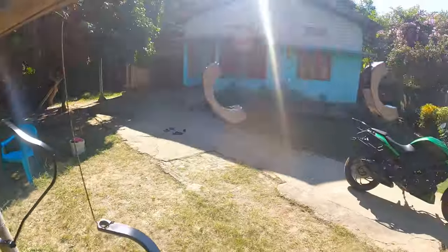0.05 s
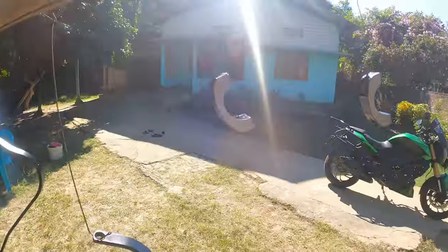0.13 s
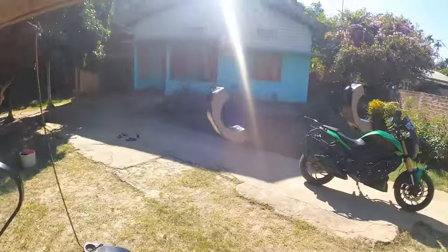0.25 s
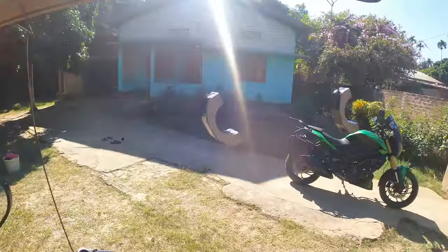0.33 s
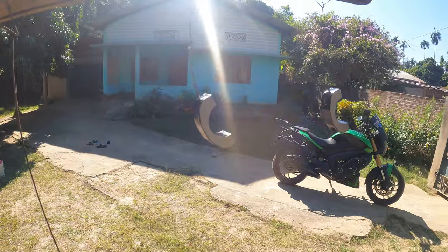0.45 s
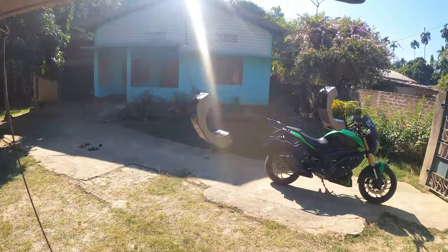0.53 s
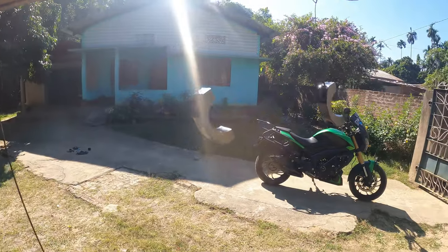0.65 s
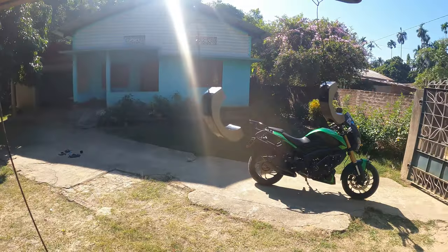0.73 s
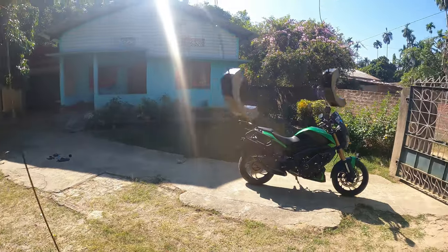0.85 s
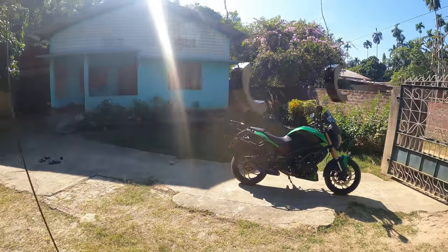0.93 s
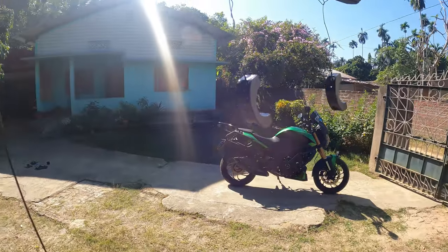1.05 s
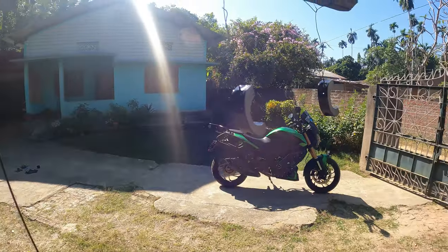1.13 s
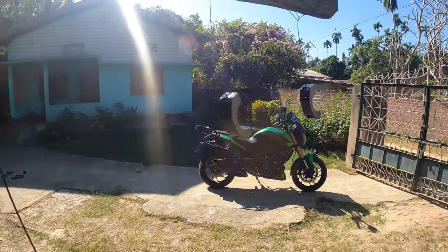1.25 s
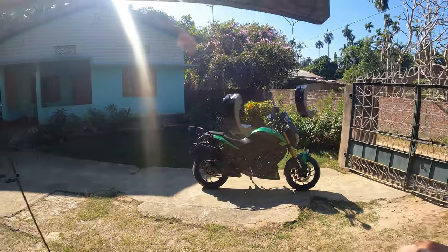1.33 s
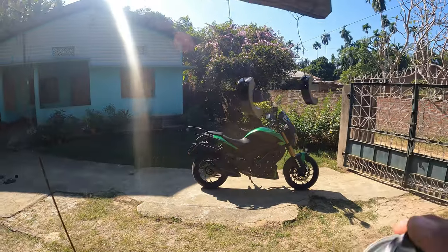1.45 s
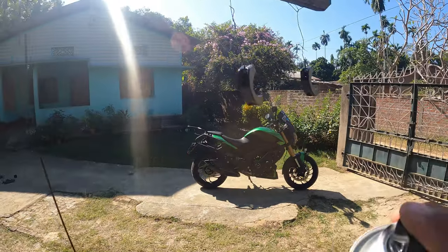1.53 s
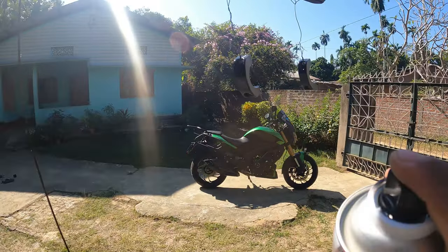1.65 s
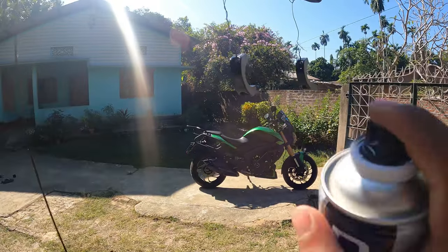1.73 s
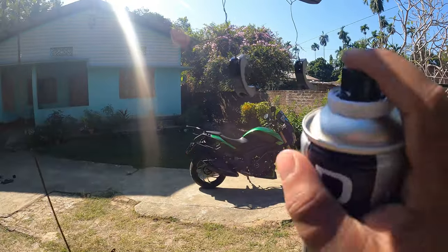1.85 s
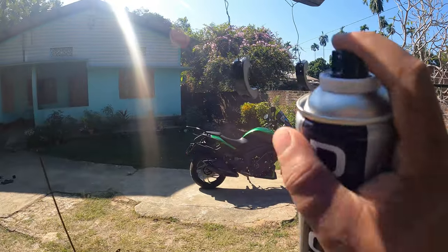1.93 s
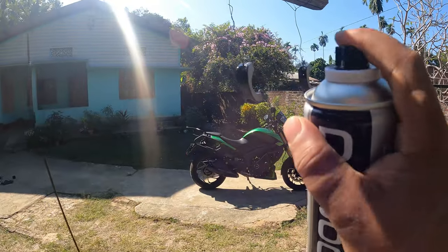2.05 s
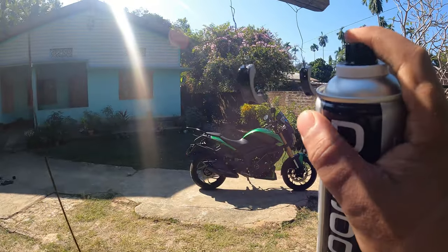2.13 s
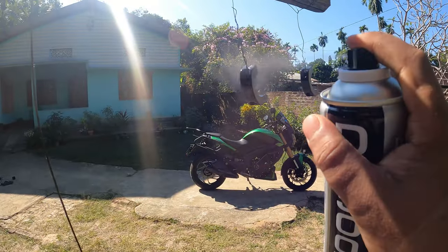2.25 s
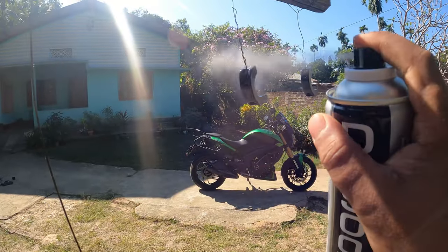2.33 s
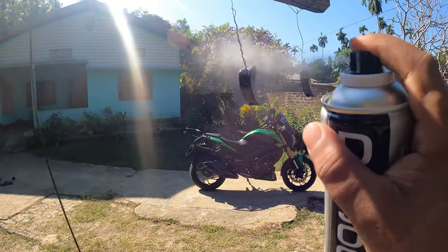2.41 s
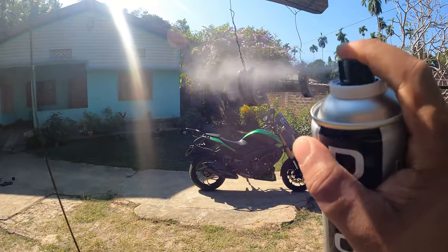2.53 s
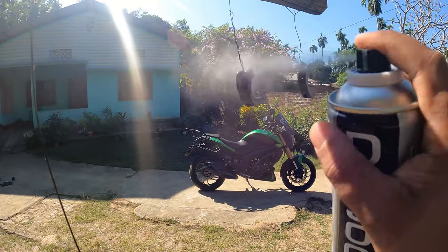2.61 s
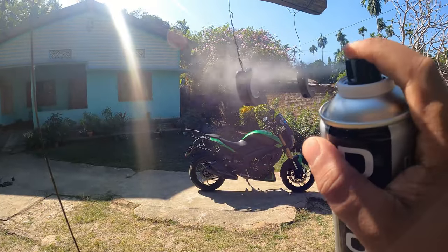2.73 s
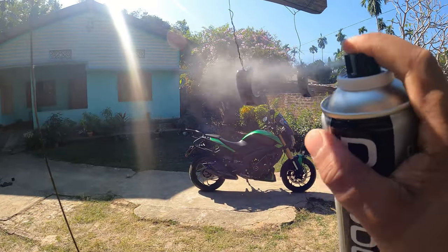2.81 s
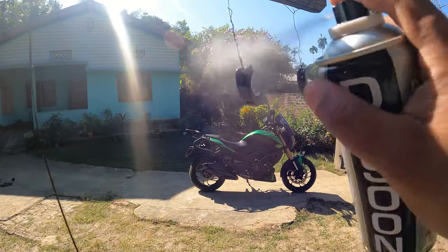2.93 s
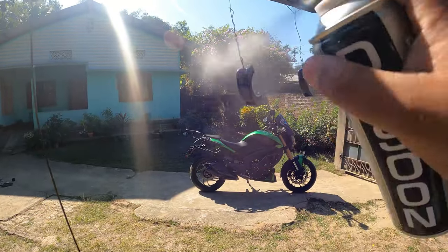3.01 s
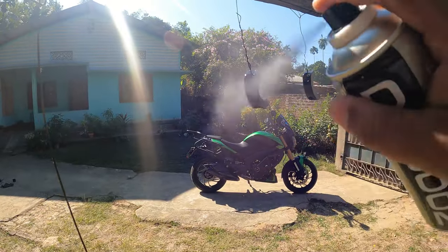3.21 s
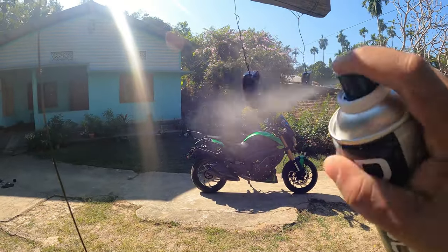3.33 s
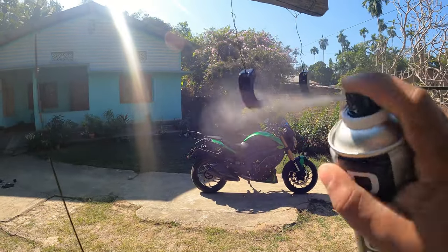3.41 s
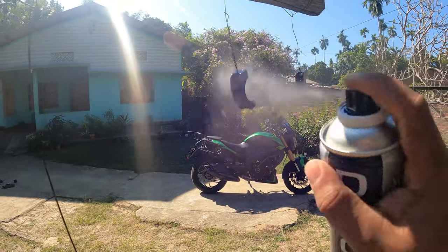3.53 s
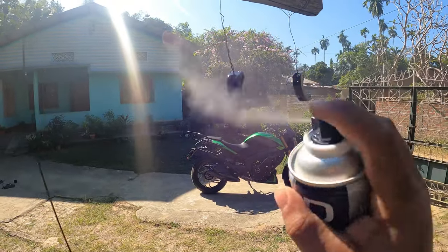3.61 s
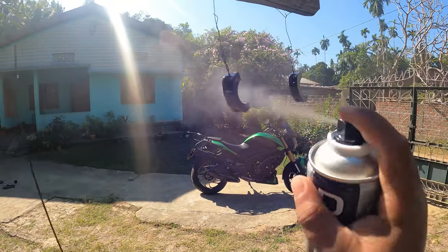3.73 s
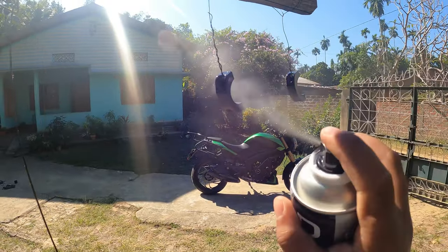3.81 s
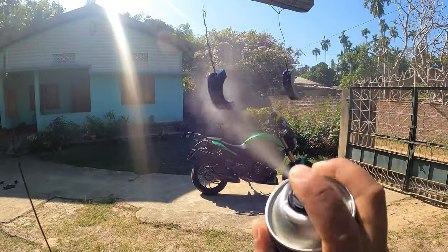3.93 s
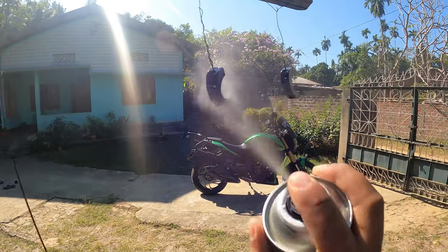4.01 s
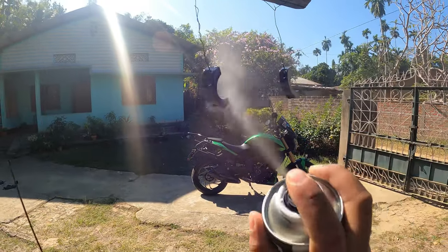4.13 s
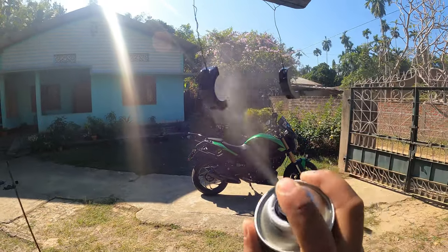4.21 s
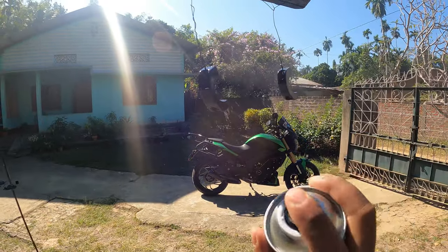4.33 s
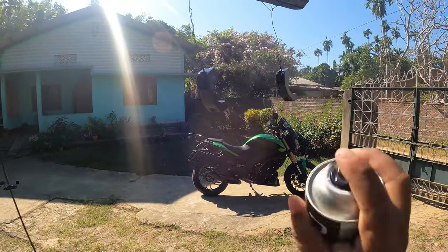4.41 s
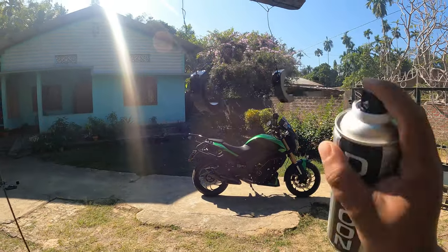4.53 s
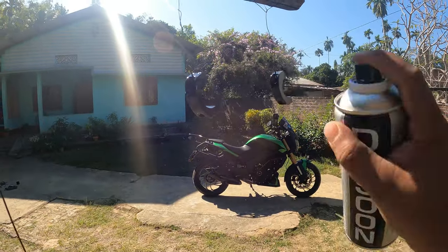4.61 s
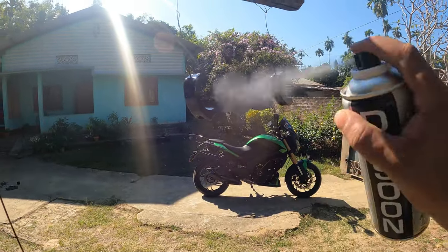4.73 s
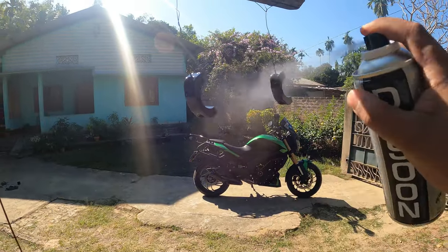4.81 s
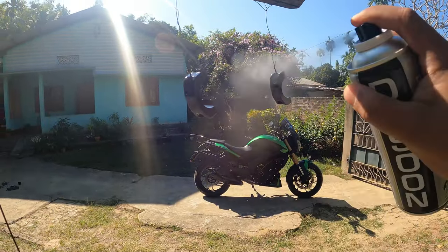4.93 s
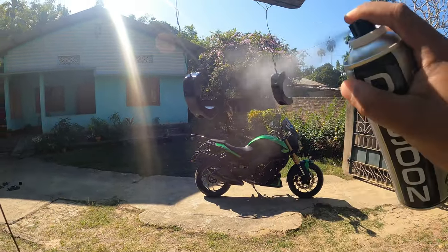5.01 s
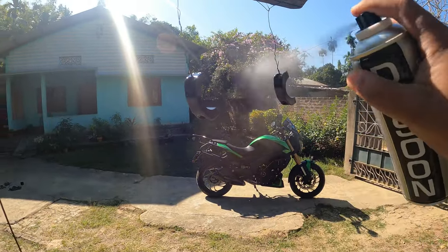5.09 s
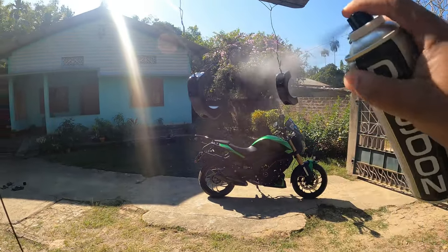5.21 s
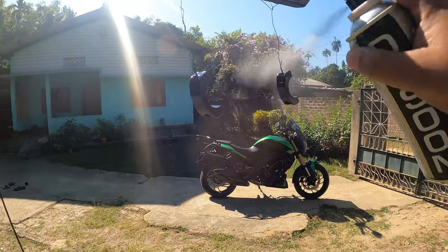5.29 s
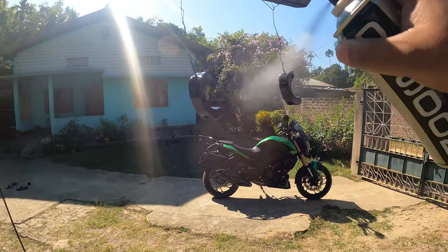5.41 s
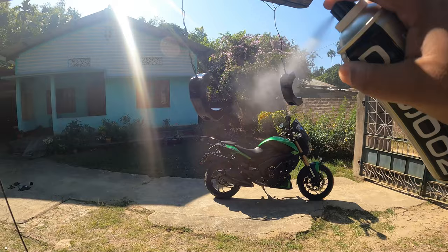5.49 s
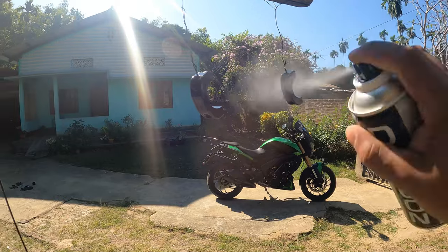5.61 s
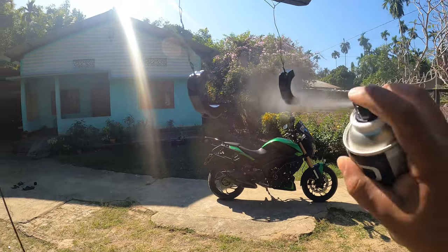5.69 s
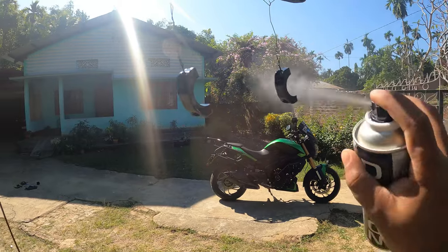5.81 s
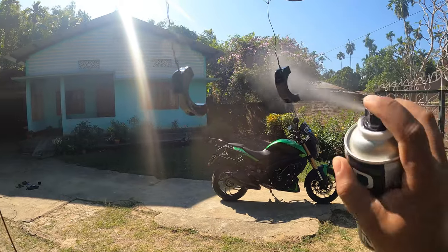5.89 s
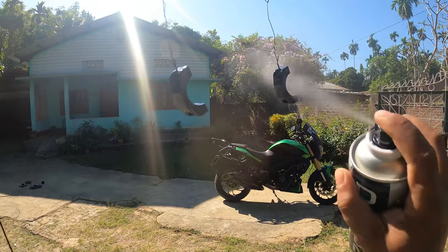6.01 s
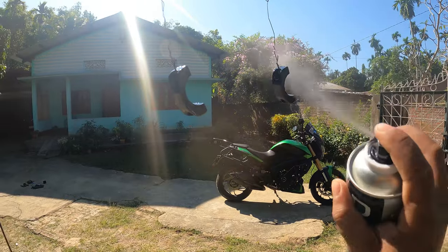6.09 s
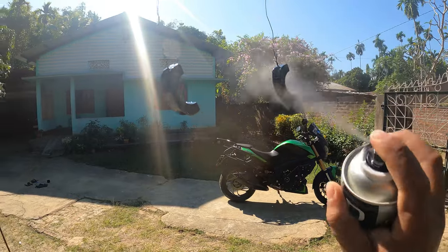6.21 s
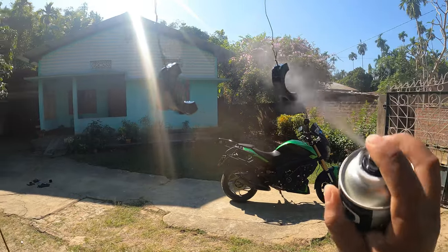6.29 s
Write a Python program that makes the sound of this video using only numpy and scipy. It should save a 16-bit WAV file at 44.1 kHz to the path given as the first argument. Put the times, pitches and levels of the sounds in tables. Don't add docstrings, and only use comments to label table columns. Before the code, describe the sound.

A quiet yard with a low, dull wash of leaves and distant noise and faint wind puffs. From 0 to 0.8 s feet rustle dry grass with papery scrapes, crisp stem snaps and soft low thuds; lighter rustles follow near 1.2 and 1.6 s. From 1.68 to 2.3 s a mixing ball clacks irregularly against a spray can, bright, hard and very short, with fingers scraping the metal. At 2.3 s a thin leak hisses, bursting at 2.4 s into a loud, turbulent jet, which wavers in brightness as the can turns, dipping around 3.2 s, and closes quickly around 4.3-4.4 s. Near 4.7 s come two small clacks, a finger scrape and a tiny chatter. A fainter leak at 4.75 s swells into a second jet at 4.8 s, slightly muffled around 5.3-5.6 s, fuller afterward and continuing to the end, about 6.4 s. Close, dry outdoor pickup.

```python
import sys
import numpy as np
from scipy import signal
from scipy.fft import rfft, irfft
from scipy.io import wavfile
from scipy.ndimage import uniform_filter1d

SR = 44100
rng = np.random.default_rng(int(sys.argv[2]) if len(sys.argv) > 2 else 0)


def magnitude_from_level(level_db):
    exponent = np.asarray(level_db, float) / 20
    return 10 ** exponent


def transcribe(u):
    v = np.clip(np.atleast_2d(u).T, -1, 1)
    q = np.round(v * 32767).astype(np.int16)
    wavfile.write(sys.argv[1], SR, q)


N = 280029

# start in seconds, peak level in dB, ring of the base in dB,
# ring of the shoulder in dB (both over the ring of the wall).
KNOCKS = [(1.6758, -4, -43, -6), (1.6974, -25, -24, -21), (1.717, -28, -18, -17), (1.731, -30, -4, -10),
          (1.7474, -25, -27, -30), (1.7893, -4, -42, -10), (1.8161, -15.5, -25, 7), (1.8281, -4, 3, -11),
          (1.868, -24, -29, -13), (1.8716, -5.5, -39, -4), (1.9603, -5, -38, 3), (2.0157, -7, 20, 9),
          (2.034, -4.5, -31, 1.5), (2.0716, -13, 3, -6), (2.1103, -4.5, 0.5, 6), (2.1254, -11, 25, 16),
          (2.1715, -5, 4, 8), (2.1747, -11, 18, 8), (2.195, -14, 3, 8), (2.2199, -16.5, -3, 9),
          (2.2373, -21, -4, 15), (2.2538, -11, 4, 3), (2.3113, -19, 8, 3), (4.6846, -16.5, -14, 4),
          (4.6978, -8.5, -32, 4)]
# leak opens in seconds, jet opens in seconds, finger lifts in seconds,
# time the valve takes to open in seconds.
PRESSES = [
    (2.302, 2.391, 4.298, .004),
    (4.754, 4.815, 7.0, .028),
]


def evened(x):
    return x / np.sqrt(np.mean(x ** 2) + 1e-20)


def read(points, hz):
    f, value = np.transpose(points)
    return np.interp(np.log(hz + 1), np.log(f + 1), value)


def add(mix, s, sound):
    part = mix[round(s * SR):][:len(sound)]
    part += sound[:len(part)]


def bandpass(x, order, low_hz, high_hz):
    return signal.sosfilt(signal.butter(order, [low_hz, high_hz], "bandpass", fs=SR, output="sos"), x)


def causal(points):
    log_gain = np.log(magnitude_from_level(read(points, abs(np.fft.fftfreq(2048, 1 / SR)))))
    return np.fft.ifft(np.exp(np.conj(signal.hilbert(log_gain)))).real[:512]


def swells(rows, rise=1.0):
    t = np.arange(N) / SR
    power = 0
    for s, db, fall in rows:
        falls = np.maximum((t - s), (s - t) / rise) / fall
        power = power + magnitude_from_level(db - 8 * falls) ** 2
    return np.sqrt(power)


def hiss(points, patchy_db, flicker_db, drift_db):
    frames, hz = N // 128 + 6, np.fft.rfftfreq(512, 1 / SR)
    a, b, fine, broad = rng.standard_normal((frames, 257, 4)).T
    patches = uniform_filter1d(fine, size=6, axis=0)
    patches = evened(uniform_filter1d(patches, size=30, axis=1))
    drifts = uniform_filter1d(broad, size=7, axis=0)
    drifts = uniform_filter1d(drifts, size=90, axis=1)
    drifts = evened(uniform_filter1d(drifts, size=50, axis=1))
    drifts = drifts * np.clip(hz / 6000, .2, 1.5)[:, None]
    flicker = evened(uniform_filter1d(rng.standard_normal(frames), size=4))
    z = (a + 1j * b) * magnitude_from_level(patchy_db * patches + flicker_db * flicker + drift_db * drifts)
    spectrum = rfft(signal.istft(z, nperseg=512, noverlap=384)[1][:N])
    return spectrum * magnitude_from_level(read(points, np.fft.rfftfreq(N, 1 / SR)))


def yard():
    # frequency in Hz, level in dB per Hz.
    wash_colour = [(20, -30), (60, -15), (150, 1), (300, -0.5), (1000, -8), (3000, -14.5), (6000, -28.5),
                   (9000, -38.5), (16000, -70)]
    # peak time in seconds, level in dB, time to fall by 8 dB in seconds.
    gusts = [
        (1.0, -54, .08),
        (1.75, -68, .4),
        (2.74, -62, .35),
        (4.1, -64, .2),
        (6.3, -63, .12),
    ]
    calm_db = -75
    duck_db, duck_from_s, duck_s = -3.3, 1.7, .4
    ducking_db = duck_db * np.clip((np.arange(N) / SR - duck_from_s) / duck_s, 0, 1)
    leaves = irfft(hiss(wash_colour, patchy_db=.6, flicker_db=.5, drift_db=-0.7), N)
    wash = magnitude_from_level(-51 + ducking_db) * evened(leaves)
    puffs = evened(bandpass(rng.standard_normal(N), 3, 40, 95))
    return wash + magnitude_from_level(-4) * (magnitude_from_level(calm_db) + swells(gusts, rise=1.6)) * puffs


def steps():
    # frequency in Hz, level in dB per Hz.
    grass_colour = [(400, -35), (900, -10), (1500, -2.5), (2700, 0), (4500, -2.5), (7000, -12), (9500, -21),
                    (12000, -31), (16000, -44)]
    # peak time in seconds, level in dB, time to fall by 8 dB in seconds.
    treads = [
        (.15, -49.5, .06),
        (.45, -55, .1),
        (.62, -49, .05),
        (1.19, -55.5, .05),
        (1.58, -52, .08),
    ]
    # peak time in seconds, level in dB, time to fall by 8 dB in seconds.
    grips = [
        (1.665, -46, .015),
        (1.83, -52, .08),
        (2.1, -61, .06),
        (2.27, -57, .025),
        (4.66, -56, .006),
        (4.728, -42, .022),
    ]
    # start in seconds, peak level in dB, pitch in Hz.
    snaps = [(0.0343, -69, 2520), (0.0618, -39.5, 2530), (0.0747, -31.5, 2600), (0.1116, -33, 2970),
             (0.1802, -31.5, 2660), (0.23, -31, 1710), (0.397, -24.5, 2600), (0.4404, -35, 2900),
             (0.5794, -29.5, 3480), (0.61, -32.5, 1610), (0.63, -27.5, 1480), (0.6407, -28, 2640),
             (0.666, -31.5, 3510), (0.7397, -39, 2630), (1.1558, -42, 1670), (1.1837, -25.5, 2430),
             (1.1994, -41, 2320), (1.2355, -37, 2930), (1.3926, -28.5, 2900), (1.4651, -40, 1340),
             (1.6447, -30.5, 2830)]
    # start in seconds, peak level in dB, pitch in Hz, length in cycles.
    thuds = [
        (0.176, -38.5, 340, 7.1),
        (0.848, -49, 172, 5),
        (0.898, -48, 217, 4.5),
        (0.941, -42, 180, 4.6),
        (1.675, -34, 330, 1.6),
    ]
    tail_db, tail_s, treble_db = -11, .25, -6.5

    t, hz = np.arange(N) / SR, np.fft.rfftfreq(N, 1 / SR)
    grains = magnitude_from_level(3.7 * np.minimum(rng.exponential(1, N), 5))
    grains = grains * (rng.random(N) < 900 / SR)
    grainy = 1 + 0.14 * evened(signal.fftconvolve(grains, np.exp(-t[:300] / 0.0012))[:N])
    spectrum = hiss(grass_colour, patchy_db=-0.5, flicker_db=0.9, drift_db=-2.7)
    dull = 1 / (1 + (hz / 3500) ** 6)
    body = evened(grainy * irfft(spectrum * dull, N))
    treble = evened(grainy * irfft(spectrum * (1 - dull), N))
    wall = evened(bandpass(body, 2, 2350, 3050))

    tails = [(s, db + tail_db, tail_s) for s, db, fall in treads[:-1]]
    level = swells(treads[:-1], rise=1.1) + swells(tails, rise=.3)
    level = level + swells(treads[-1:]) * (t < KNOCKS[0][0])
    out = level * (body + magnitude_from_level(treble_db) * treble)
    out += swells(grips, rise=.9) * (.6 * body + .4 * treble + 0.61 * wall)
    for s, peak_db, pitch_hz in snaps:
        crack = signal.fftconvolve(rng.standard_normal(800), causal(grass_colour))[:800]
        tone = np.sin(2 * np.pi * pitch_hz * t[:800])
        snap = magnitude_from_level(-60 * t[:800] / 0.023) * (tone + 0.5 * evened(crack))
        add(out, s, magnitude_from_level(peak_db - 3.5) * snap / abs(snap).max())
    for s, peak_db, pitch_hz, cycles in thuds:
        length = round(max(cycles, 1) / pitch_hz * SR)
        add(out, s, magnitude_from_level(peak_db) * np.sin(2 * np.pi * pitch_hz * t[:length]) * np.hanning(length))
    return out


def rolling(t):
    # start in seconds, end in seconds, pitch in Hz, level in dB.
    start, end, hz, db = (1.722, 1.79, 1520, -50)
    rub = rng.standard_normal(round(.07 * SR))
    ring = magnitude_from_level(-60 * t / 0.064) * np.sin(2 * np.pi * hz * t)
    hum = signal.fftconvolve(rub, ring)[:round((end - start) * SR)]
    return start, magnitude_from_level(db) * evened(hum) * signal.windows.tukey(len(hum), .3)


def rattle():
    # frequency in Hz, level in dB, time to fall by 60 dB in seconds.
    can_modes = [
        [(1050, -30, .015), (1640, 24.5, 0.014), (2270, 16, 0.017)],
        [(2550, 12, .016), (2940, 20, 0.015)],
        [(3760, 7.5, 0.0072), (4230, -1.5, 0.019)],
        [(5330, 9.5, 0.011), (5820, 6.5, 0.012), (6570, -3, 0.03), (8150, -5, .014), (9930, -11, 0.02),
         (11400, -31, 0.015)],
    ]
    # frequency in Hz, level in dB.
    crack_points = [(300, -59), (900, -23), (1600, -12), (2750, 8), (3300, -0.5), (4500, -2.5), (7000, -7),
                    (8500, -20), (11000, -25), (12500, -50), (16000, -70)]
    # start in seconds, peak level in dB.
    chatter = [
        (4.7154, -23),
        (4.7192, -21),
        (4.723, -22),
        (4.73, -27),
        (4.7364, -26),
        (4.7424, -29),
        (4.7456, -27),
    ]
    chatter_base_db, chatter_shoulder_db = -13, -3
    rim_db = -1.5

    out, t, crack_colour = np.zeros(N), np.arange(3000) / SR, causal(crack_points)
    short = t[:600]
    bounces = [(*row, chatter_base_db, chatter_shoulder_db) for row in chatter]
    for s, peak_db, base_db, shoulder_db in KNOCKS + bounces:
        shares_db = [base_db, 0, shoulder_db, shoulder_db + rim_db]
        contact = rng.standard_normal(600) * np.minimum(short / 0.00087, 1) ** 2
        detune = 1 + .045 * rng.uniform(-1, 1, (4, 6))
        spot_db = 2.5 * rng.uniform(-1, 1, (4, 6))
        blow = contact * np.exp(-short / 0.00084)
        rings = 0
        for g, modes in enumerate(can_modes):
            ring = np.zeros(3000)
            for k, (hz, db, t60) in enumerate(modes):
                decay = magnitude_from_level(db + spot_db[g, k] - 60 * t / t60)
                ring += decay * np.sin(2 * np.pi * hz * detune[g, k] * t)
            ring = signal.fftconvolve(blow, np.gradient(ring))[:3000]
            rings = rings + magnitude_from_level(shares_db[g]) * evened(ring)
        crack = signal.fftconvolve(contact * np.exp(-short / 0.0027), crack_colour)
        crack = np.pad(crack, (0, 3000))[:3000]
        knock = evened(rings) + magnitude_from_level(-4.0 + 0.25 * peak_db) * evened(crack)
        add(out, s, magnitude_from_level(peak_db) * knock / abs(knock).max())
    add(out, *rolling(t))
    scatter = rng.standard_normal(4000) * magnitude_from_level(-60 * np.arange(4000) / SR / 0.1)
    out = out + magnitude_from_level(-19.5) * signal.fftconvolve(out, scatter / np.linalg.norm(scatter))[:N]
    return bandpass(out, 3, 800, 9000)


def held():
    # time in seconds, hand shades the can in dB, jet aims past the camera in dB,
    # nozzle faces the camera in dB.
    hold = [
        [(2.45, 0.3, 0.5, 3), (2.95, 0.6, -2.5, 1), (3.05, -1, 1.5, -3), (3.15, -6, 0.4, -3.5),
         (3.27, -4.5, 0.8, -2), (3.36, -.5, -.5, -5), (3.6, -.6, -2.5, .8), (3.8, -.6, -1, -1.5),
         (4.0, -.7, 3.5, -1.2)],
        [(4.85, -2.5, 5, 1.5), (5.0, -3.8, 7, -1.5), (5.3, -6, 5.5, -2), (5.47, -7.5, 4.5, 1),
         (5.6, -7.5, 3.5, -.5), (5.7, -3.5, 3, -3), (5.8, -2.2, 1.5, 0.3), (6.0, -2.3, 5.5, 1.5),
         (6.25, -2.2, 6.5, 3)],
    ]
    s, *columns_db = np.transpose(hold[0] + hold[1])
    return [np.interp(np.arange(N) / SR, s, db) for db in columns_db]


def jet():
    # frequency in Hz, level in dB per Hz.
    jet_colour = [(40, -64.5), (150, -21), (300, -6), (480, -13), (650, -9.5), (1300, -13), (2000, -5.5),
                  (2750, -2), (3200, -14.5), (3700, -10), (5100, -16.5), (5600, -14.5), (7300, -12.5),
                  (7700, -19), (8700, -21.5), (9700, -20.5), (10800, -26.5), (11400, -24), (12500, -32),
                  (14000, -35), (15000, -40), (16000, -54)]
    # edge in Hz between neighbours among rumble, hiss, fizz, sizzle and air.
    layer_edges_hz = [1200, 3200, 5000, 7600]
    # level in dB of one layer, for the full jet, then for the leak of each press.
    jet_db = [-32.5, -21.5, -33.3, -34.1, -41]
    leaks_db = [
        [-47, -33.5, -36.5, -36.5, -40],
        [-52, -39, -39, -39, -42],
    ]
    # share of the shade, aim or facing in dB that reaches one layer, as a ratio.
    shade_share = [.75, 1.0, .2, 0.0, .35]
    aim_share = [-.35, 0.0, .1, 0.0, 1.0]
    face_share = [0.0, 0.0, 0.0, 1.0, .1]
    # change in dB of one layer, as stored pressure leaves first, then as the valve chokes.
    surge_db = [1.5, 1.5, 1.5, 1.5, 1.5]
    choke_db = [-22, -30, -28, -30, -28]
    swell_db, swell_s = -7, .03
    surge_s, close_s = .04, .09
    dribble_db_per_s = 240

    spectrum = hiss(jet_colour, patchy_db=1.4, flicker_db=0.6, drift_db=0.92)
    hz = np.fft.rfftfreq(N, 1 / SR)
    below = [1 / (1 + (hz / edge) ** 12) for edge in layer_edges_hz]
    shares = np.diff([0 * hz] + below + [0 * hz + 1], axis=0)
    layers = np.array([evened(irfft(spectrum * share, N)) for share in shares])

    t, level = np.arange(N) / SR, 0
    shade_db, aim_db, face_db = held()
    full_db = np.c_[jet_db] + np.c_[shade_share] * shade_db
    full_db = full_db + np.c_[aim_share] * aim_db + np.c_[face_share] * face_db
    for (leak, full, lift, opening), leak_db in zip(PRESSES, leaks_db):
        thin_db = np.c_[leak_db] + swell_db * np.exp(-abs(t - leak) / swell_s)
        close_db = np.c_[choke_db] * np.clip((t - lift) / close_s, 0, 1) ** 2
        close_db = close_db - dribble_db_per_s * np.maximum(t - lift - close_s, 0)
        open_db = full_db + np.c_[surge_db] * np.exp(-abs(t - full) / surge_s) + close_db
        spraying = np.clip((t - full) / opening + .5, 0, 1) ** 2
        level = level + (t > leak) * (1 - spraying) * magnitude_from_level(thin_db) + spraying * magnitude_from_level(open_db)
    return (level * layers).sum(0)


def scene():
    mono = yard() + steps() + rattle() + jet()
    return np.array([mono, mono])


def top_cut(x):
    return signal.sosfilt(signal.butter(12, 15810, fs=SR, output="sos"), x)


def record(dry):
    # frequency in Hz, side over mid in dB.
    port_colour = [(30, -35), (150, -27), (900, -28.5), (1500, -35.5), (8000, -29.5), (10500, -24),
                   (11500, -6.5), (13000, 8.5), (16000, 7)]
    hz, t, z = signal.stft(dry.mean(0), SR, nperseg=256)
    z = z * (hz < 15850)[:, None]
    unrelated = np.exp(2j * np.pi * rng.random(z.shape[::-1]).T)
    shade_db, aim_db, face_db = (np.interp(t, np.arange(N) / SR, db) for db in held())
    spraying = t > PRESSES[0][0]

    top = np.clip((hz - 12600) / 1200, 0, 1)[:, None]
    bearing_db = top * (3 - .2 * shade_db - 1.0 * aim_db + .7 * face_db) * spraying
    edge = np.clip((hz - 14600) / 600, 0, 1)[:, None]
    edge_db = edge * (6.5 + 2.2 * shade_db - 1.1 * aim_db)
    narrow_side_db = -16
    spray_side_db = np.clip(-9 + 16 * face_db, narrow_side_db, 8)
    bass_side_db = (hz < 1100)[:, None] * np.where(spraying, spray_side_db, narrow_side_db)

    side_db = read(port_colour, hz)[:, None] + bass_side_db + .8 * edge_db
    side_db = side_db - 14 * np.clip((hz - 14600) / 900, 0, 1)[:, None]
    side = z * magnitude_from_level(side_db) * (-.4 + .3j + 0.67 * unrelated)
    side = signal.istft(side, SR, nperseg=256)[1][:N]
    mid = signal.istft(z * magnitude_from_level(bearing_db + edge_db), SR, nperseg=256)[1][:N]
    off = (np.fft.rfftfreq(N, 1 / SR) - 9000) / 330
    mid = irfft(rfft(mid) * (.005 + 1j * off) / (1 + 1j * off), N)
    return top_cut(np.array([mid + side, mid - side]))


dry = scene()
out = record(dry)
transcribe(out)
```